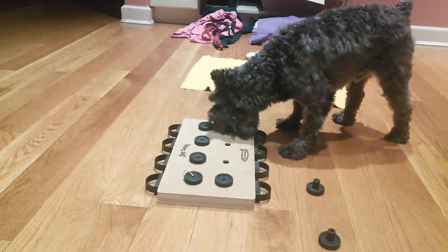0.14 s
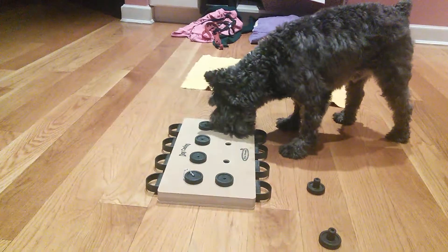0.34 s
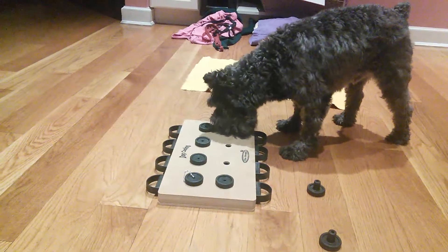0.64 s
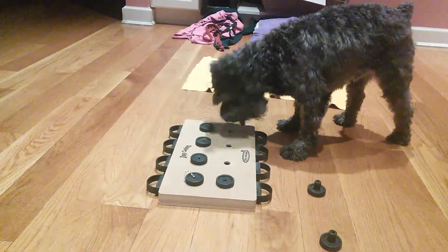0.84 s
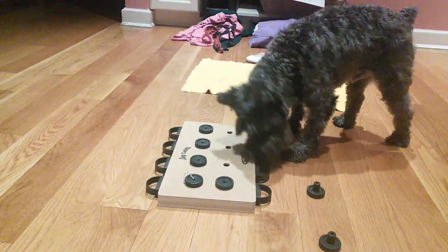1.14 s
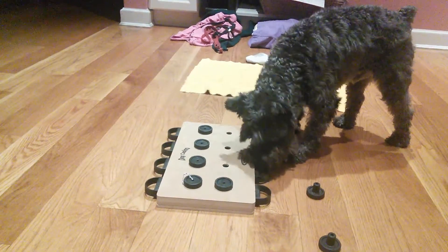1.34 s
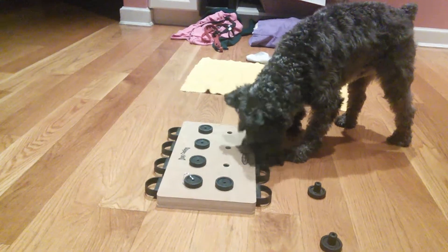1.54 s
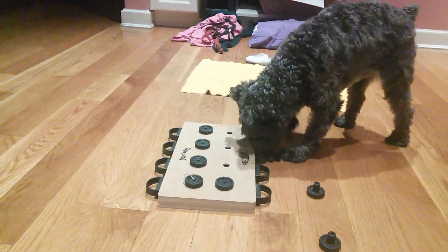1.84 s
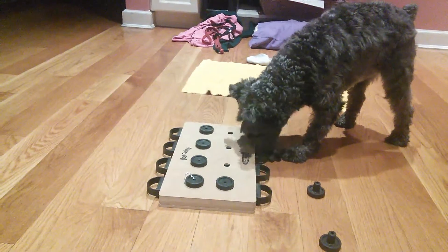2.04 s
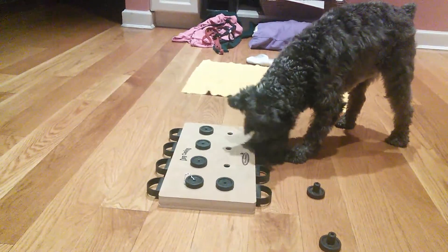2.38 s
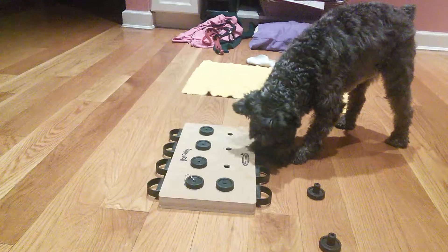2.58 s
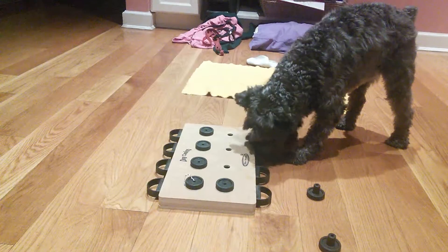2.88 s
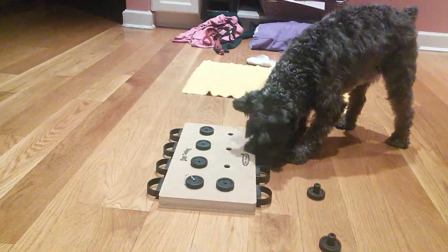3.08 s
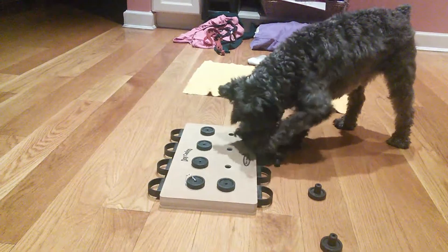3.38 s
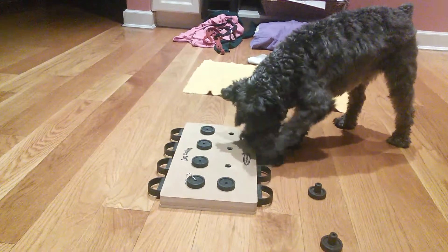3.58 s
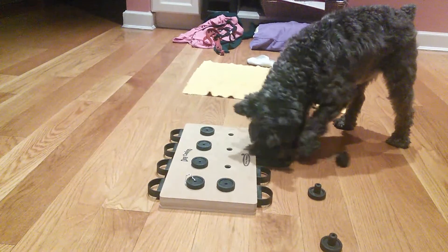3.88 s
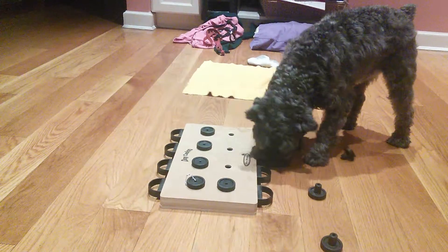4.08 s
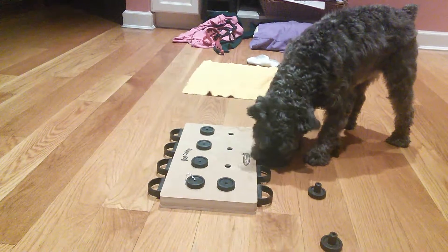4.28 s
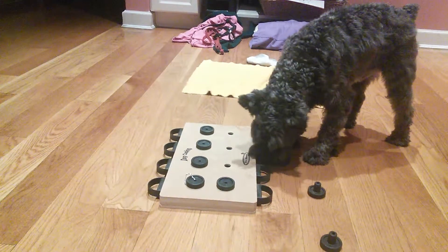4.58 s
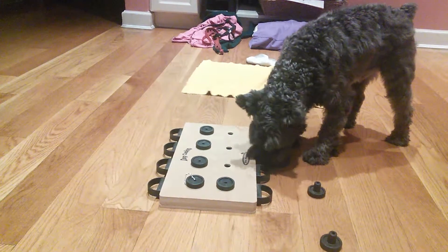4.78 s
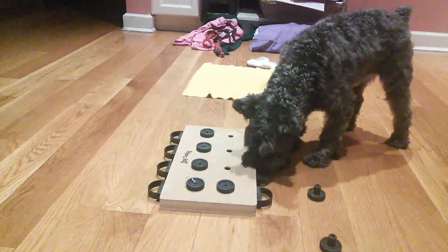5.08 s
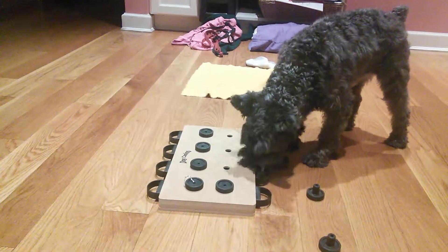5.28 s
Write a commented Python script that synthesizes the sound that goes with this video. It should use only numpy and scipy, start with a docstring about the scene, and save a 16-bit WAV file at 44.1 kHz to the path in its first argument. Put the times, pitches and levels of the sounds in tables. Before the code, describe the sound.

A dog works a hollow wooden treat puzzle on a hard floor, about a metre from the microphone. It opens with soft wood scraping and a few light knocks around 0.3 to 0.6 seconds, then a faint sniff. At 1.5 seconds the board drops with a loud clatter, bouncing faster and quieter until it rests at about 1.85. A short sniff at 2.3 leads to a cluster of sharp knocks near 2.45 and a smaller one at 2.7. Around 3.6 come more sniffs and taps, building to two loud hollow knocks at 3.75 and 3.85, the first with a bright click. From 4 seconds on there are light taps, uneven wooden sliding, faint paw shuffles and a very faint rustle of fur, with a small flurry of taps near 5.1. The room rings briefly after each blow, over faint steady background noise.

```python
"""A hollow wooden puzzle clatters on a hard floor as a dog noses and paws it, a metre from a phone.
The board drops and bounces to rest, and drawers and pegs knock: each blow rings the wood's short modes.
Wood slides in stick-slip grains, sniffs whistle in the holes, paws shuffle and fur or cloth rustles.
The bare room rings briefly after each blow, over a faint steady noise."""
import sys
import numpy as np
from scipy import signal
from scipy.fft import rfft, irfft, next_fast_len
from scipy.io import wavfile
from scipy.ndimage import uniform_filter1d

SR = 44100
rng = np.random.default_rng(int(sys.argv[2]) if len(sys.argv) > 2 else 0)


def to_wav(sig):
    """Store sig (one row per channel, or 1-D mono) as 16-bit WAV at the path in sys.argv[1].

    Samples outside -1..1 are clipped; the rate is SR.
    """
    pcm = np.clip(np.atleast_2d(sig), -1, 1) * 32767
    pcm = np.round(pcm).astype(np.int16)
    wavfile.write(sys.argv[1], SR, pcm.T)  # frames by channels


N = 239127

# the board rocking to rest: t/s, strength/dB
BOUNCES = [(1.522, -1), (1.6048, -3), (1.6518, -9.5), (1.6713, -6), (1.7146, -12), (1.7227, -18.5),
           (1.7534, -13), (1.7709, -29), (1.7846, -18.5), (1.7993, -29.5), (1.8065, -22), (1.8217, -30.5),
           (1.8324, -33.5), (1.8427, -29)]
# softer bounces are duller; rows are box, lid, small parts, tick: full-blow level/dB, slope/(dB/dB)
BOUNCE_MIX = [(-8, 0.67), (-0.5, 1), (-7.5, 0.92), (-13.5, 2)]
# hard knocks of drawers and pegs: t/s, box/dB, lid/dB, small parts/dB, tick/dB, contact/ms
KNOCKS = [(0.2992, -23.5, -26, -12.5, -35, 2.2), (0.4018, -20.5, -21.5, -31, -62, 2),
          (2.4305, -36.5, -30, -28, -33, 2.8), (2.4392, -14.5, -17, -14, -9.5, 4.3),
          (2.4462, -36, -23.5, -22.5, -19, 21), (2.465, -28.5, -16, -13.5, -15, 12),
          (2.7017, -25.5, -27.5, -36, -64, 0.43), (3.56, -36, -39.5, -24.5, -25, 4),
          (3.738, -11.5, -22.5, -4, -11.5, 2.7), (3.8272, -7, -6, -7, -22, 5.9),
          (5.1122, -44, -31.5, -36.5, -24, 0.82)]
# light touches: t/s, level/dB, kind of touch
TAPS = [(0.3128, -26.5, "box"), (0.4148, -23.5, "box"), (0.5183, -36, "box"), (0.5809, -30.5, "box"),
        (0.6285, -43, "lid"), (0.6446, -47, "lid"), (0.817, -48, "box"), (1.9301, -50.5, "claw"),
        (2.5058, -21.5, "lid"), (2.7105, -28.5, "edge"), (2.7163, -33, "edge"), (2.7205, -38, "edge"),
        (3.0217, -45, "lid"), (3.0311, -42, "lid"), (3.3607, -44.5, "peg"), (3.6175, -31, "peg"),
        (3.6614, -33, "lid"), (3.6917, -33, "rub"), (3.713, -27.5, "box"), (3.7265, -27, "peg"),
        (3.7534, -18.5, "peg"), (4.0834, -33.5, "box"), (4.0948, -54, "claw"), (4.1411, -37, "peg"),
        (4.1596, -49, "claw"), (4.1862, -31, "box"), (4.2473, -42, "box"), (4.2806, -37, "box"),
        (4.3203, -35, "box"), (4.3722, -43.5, "box"), (4.6048, -49, "lid"), (5.0462, -39, "box"),
        (5.0534, -28.5, "box"), (5.0612, -36, "box"), (5.0717, -35, "lid"), (5.0767, -36, "edge"),
        (5.0895, -36, "peg"), (5.1072, -40, "peg"), (5.1172, -31, "claw")]
# colour of each kind of touch: box/dB, lid/dB, small parts/dB, tick/dB, contact/ms
TOUCH_MIX = {"box": (-1.5, -21, -27.5, -32, 4), "lid": (-12.5, -1.5, -11, -21, 1.2),
             "peg": (-20, -10.5, -2, -13.5, 6.2), "rub": (-3, 3, -9.5, -26.5, 15),
             "edge": (-0.5, -4.5, -17, -33, 1.2), "claw": (-12.5, -7, -11, 2.5, 1.1)}
# tiny bright pings, as of a peg or claw: t/s, level/dB, f/Hz
PINGS = [(0.1204, -48, 4630), (0.2994, -22, 4100), (1.522, -38, 5830), (1.6048, -39, 5890),
         (1.6522, -33.5, 6990), (1.6707, -37, 7000), (1.723, -45, 7100), (2.038, -46.5, 5250),
         (3.0217, -42, 1700), (3.3406, -62, 5000), (3.7375, -11.5, 5100), (4.1602, -48, 10800)]
# where the registers of hollow box, lid, small parts and dry tick begin: f/Hz
PART_EDGES_HZ = [0, 1100, 2500, 5500]
# modes of the puzzle board: f/Hz, width/Hz, level/dB
BOARD_MODES = [(730, 174, -2.5), (830, 240, -1.5), (1250, 670, -16), (1496, 266, -4.5), (1775, 395, 8.5),
               (1965, 160, -22), (2700, 260, 3), (3005, 350, 4), (3530, 280, -5), (4400, 250, -14)]
# modes of the floor under it: f/Hz, width/Hz, level/dB
FLOOR_MODES = [(324, 110, -7), (455, 130, -21)]
# modes of the drawers: f/Hz, width/Hz, level/dB
DRAWER_MODES = [(574, 840, -7), (715, 272, 11), (850, 240, 9.5), (1395, 290, 1.5), (1626, 280, -1),
                (2122, 140, -3.5), (2340, 290, -4), (2907, 200, 3.5), (3270, 430, 14.5), (3700, 500, 6.5),
                (4100, 110, -15.5), (5070, 420, 7), (5280, 1100, -4.5)]
# strokes of wood on wood: t/s, length/s, start level/dB, end level/dB, scuff offset/dB
SLIDES = [(0.0, 0.21, -54.5, -64.5, -13), (0.196, 0.1, -59, -57.5, -7), (0.613, 0.55, -57, -85, -10.5),
          (3.096, 0.1, -75, -65.5, -9), (3.3, .2, -78, -81, 2.5), (3.585, 0.16, -68.5, -51.5, 3),
          (4.069, .14, -46, -57.5, -17), (4.266, .27, -58.5, -55, -42), (4.594, 0.52, -57.5, -60, -12.5),
          (5.157, .06, -54.5, -69, -5), (5.234, 0.23, -58.5, -63.5, -11.5)]
# puffs through the nose: peak t/s, level/dB, rise/s, fall/s
SNIFFS = [(0.84, -48.5, 0.046, 0.048), (2.282, -41.5, .006, 0.078), (2.404, -54, .004, 0.13),
          (2.428, -48, 0.009, .004), (3.575, -42.5, 0.0057, 0.1), (3.615, -38.5, 0.0093, 0.049),
          (3.68, -49, 0.046, .08)]
# resonances of nostrils and peg holes: f/Hz, width/Hz, level/dB
NOSE_MODES = [(1400, 300, -8), (1690, 300, -5), (2180, 300, -6), (2730, 330, 0), (3600, 1100, -13),
              (4960, 400, -2), (5700, 800, -12), (9000, 2500, -31)]
# paws shifting on the floor: peak t/s, level/dB, rise/s, fall/s
PAW_STEPS = [(0.03, -71, 0.075, 0.083), (0.23, -63, .03, 0.1), (4.1, -70.5, .03, 0.31),
             (4.536, -68, .5, 0.28), (4.684, -59.5, 0.052, 0.16), (4.83, -56.5, 0.041, 0.46),
             (5.242, -61.5, 0.027, .9)]
# brushes of fur or cloth: peak t/s, level/dB, rise/s, fall/s
RUSTLES = [(2.054, -66, .012, .09), (3.272, -74, .04, 0.13), (3.354, -73.5, 0.069, .24),
           (3.61, -61, .06, .07), (3.95, -70.5, .15, 0.79), (4.158, -70, .01, 0.21),
           (5.14, -79, .01, 0.071), (5.27, -76.5, 0.067, .4)]
# octave bands of the reverb tail: f/Hz, t60/s, trim/dB
ROOM_BANDS = [(280, 0.77, 0.5), (463.4, 0.55, 0), (1024, 0.5, 2.5), (2020, 0.52, -1), (4010, 0.48, 1),
              (7400, 0.45, -2), (13500, 0.34, 0.5)]
# spectrum of the room tone: f/Hz, relative density/dB
ROOM_TONE = [(15, -57.5), (25, -35), (53, -19), (166, -1.5), (249, -3.5), (416, -6), (489, -6), (607, -13),
             (1190, -9), (1440, -19), (1840, -14.5), (2000, -17.5), (16000, -34)]

FAR_END_UNTIL_S, FAR_END_PITCH = 1.0, 0.84  # the dog starts at the far end, whose hollow rings lower


def board_drop():
    """The board bounces to rest and sounds the floor under it; returns the direct and wall feeds."""
    drops = [(s, *(full + slope * db for full, slope in BOUNCE_MIX), 0.21) for s, db in BOUNCES]
    board = blows(drops, BOARD_MODES, scatter_db=1, rise_ms=0.58, tick_top_hz=7600, blur=1)
    direct, walls = small_box(board, low_hz=601) + ring(board, FLOOR_MODES, order=2)
    return np.array([direct, band(walls, 100, 4770, order=3)])  # aimed treble: little reaches the walls


def drawer_knocks():
    """Knocks and light taps ring the hollow drawers; returns the direct and wall feeds."""
    taps = [(s, *(db + np.array(TOUCH_MIX[kind][:-1])), TOUCH_MIX[kind][-1]) for s, db, kind in TAPS]
    out = 0
    for far_end, pitch in (True, FAR_END_PITCH), (False, 1):
        rows = [row for row in KNOCKS + taps if (row[0] < FAR_END_UNTIL_S) == far_end]
        modes = [(hz * pitch if hz < PART_EDGES_HZ[1] else hz, width, db) for hz, width, db in DRAWER_MODES]
        wood = blows(rows, modes, scatter_db=2, rise_ms=0.27, tick_top_hz=13680, blur=0.4)
        out = out + small_box(wood, low_hz=673 * pitch)
    return out


def blows(rows, modes, scatter_db, rise_ms, tick_top_hz, blur):
    """Struck wood rings, rattles and ticks, from rows laid out like KNOCKS; returns direct and wall feeds."""
    t = np.arange(2048) / SR
    direct, walls = np.zeros((2, N + len(t)))
    hz, width, db = np.transpose(modes)[:, :, None]
    part = np.minimum(np.searchsorted(PART_EDGES_HZ, hz[:, 0]) - 1, 2)
    impulse = 1. * (t == 0)
    tick = band(impulse, PART_EDGES_HZ[3], tick_top_hz)

    def layers(partials):
        """Group the modes into box, lid and small parts, with the tick on top."""
        return [partials[part == k].sum(axis=0) for k in range(3)] + [tick]

    ringing = undb(db) * mode_envelope(t, rise_ms, width) * np.sin(2 * np.pi * hz * t)
    clean_layers = layers(ringing)
    wall_layers = layers(ringing * np.exp(-np.pi * blur * width * t))  # all sides blend: an evener colour
    for s, *levels_db, contact_ms in rows:
        spot = undb(scatter_db * rng.standard_normal(hz.shape))  # each new spot reweights the modes
        grit = 0.15 * np.exp(-1000 * t / max(contact_ms, .1))
        force = impulse + grit * rng.standard_normal(len(t))  # one impact, then loose micro-contacts
        span = slice(int(s * SR), int(s * SR) + len(t))
        for level_db, struck, clean, blurred in zip(levels_db, layers(spot * ringing),
                                                    clean_layers, wall_layers):
            voice = signal.fftconvolve(struck, force)[:len(t)]
            gain = undb(level_db) * np.linalg.norm(clean) / np.abs(clean).max()
            gain *= np.sqrt(1 + np.sum(grit ** 2))  # the rattle adds energy
            direct[span] += gain * voice / np.linalg.norm(voice)
            walls[span] += gain * blurred / np.linalg.norm(blurred)
    return np.array([direct[:N], walls[:N]])


def mode_envelope(t, rise_ms, width_hz):
    """A struck mode swells for a moment; the wider it is, the faster it dies."""
    return (1 - np.exp(-1000 * t / rise_ms)) ** 2 * np.exp(-np.pi * width_hz * t)


def small_box(x, low_hz):
    """A small box radiates little bass."""
    return signal.sosfilt(signal.butter(6, low_hz, "highpass", fs=SR, output="sos"), x)


def pings():
    """Each ping is one short, bright mode."""
    out, t = np.zeros(N), np.arange(1024) / SR
    envelope = mode_envelope(t, rise_ms=.4, width_hz=420)
    for s, db, hz in PINGS:
        out[int(s * SR):][:len(t)] += undb(db) * envelope / envelope.max() * np.sin(2 * np.pi * hz * t)
    return out


def sliding_wood():
    """Uneven stick-slip grains shake the lower drawer modes; a finer scuff rides on top."""
    grains = rng.standard_normal(N) * flicker(120, 5.0) * flicker(25, 0.88)
    hollow = unit(ring(grains, [mode for mode in DRAWER_MODES if mode[0] < 1500]))
    body = unit(hollow + 0.89 * unit(band(grains, 280, 880)))
    scuff = unit(band(grains, 2500, 4200) + .4 * band(grains, 4700, 5100))
    body_level = strokes([row[:-1] for row in SLIDES])
    scuff_level = strokes([(s, length, a + offset, b + offset) for s, length, a, b, offset in SLIDES])
    return body_level * body + scuff_level * scuff


def sniffs():
    """Fluttering air whistles in nostrils and peg holes."""
    air = rng.standard_normal(N) * flicker(90, 4.0)
    return swells(SNIFFS) * unit(ring(air, NOSE_MODES, order=2))


def paws():
    """A soft low shuffle carried by the floorboards."""
    return swells(PAW_STEPS) * unit(band(rng.standard_normal(N) * flicker(9.4, 4.7), 140, 330))


def rustle():
    """Fur or cloth brushes with a thin, high hiss."""
    return swells(RUSTLES) * unit(band(rng.standard_normal(N) * flicker(40, 1.5), 10000, 17000))


def room_reverb(x, wet_db=-5, gap_s=.004, rise_s=.0029):
    """Diffuse echoes build after a short gap, bunch at the first walls and die faster in the treble."""
    t = np.arange(int(.9 * SR)) / SR
    tail = 0
    for hz, t60, db in ROOM_BANDS:
        octave = unit(band(rng.standard_normal(len(t)), hz / np.sqrt(2), hz * np.sqrt(2)))
        tail = tail + undb(db - 60 * t / t60) * octave * np.sqrt(hz)
    tail *= 1 - np.exp(-np.maximum(t - gap_s, 0) / rise_s)
    tail *= undb(2.5 * np.exp(-((t - .017) / .0031) ** 2))  # the first walls answer at 17 ms
    return undb(wet_db) * signal.fftconvolve(x, tail / np.linalg.norm(tail))[:N]


def room_tone(level_db=-67):
    """A bed of steady house and microphone noise, wavering a little."""
    size = next_fast_len(N)
    hz, db = np.transpose(ROOM_TONE)
    bins_hz = np.arange(size // 2 + 1) * SR / size
    colour = undb(np.interp(np.log(bins_hz + 1), np.log(hz), db))
    noise = irfft(rfft(rng.standard_normal(size)) * colour, size)[:N]
    return undb(level_db) * unit(noise) * flicker(1.7, 0.4)


def strokes(rows):
    """Fader moves that run evenly in dB across each stroke, with soft edges."""
    t = np.arange(N) / SR
    level = sum(undb(np.interp(t, [s, s + length], [from_db, to_db])) * (t >= s) * (t <= s + length)
                for s, length, from_db, to_db in rows)
    return uniform_filter1d(level, size=400, mode="nearest")


def swells(rows):
    """Each swell climbs 20 dB in its rise time and sinks 20 dB in its fall time."""
    t = np.arange(N) / SR
    return sum(undb(db - 20 * np.maximum((s - t) / rise, (t - s) / fall)) for s, db, rise, fall in rows)


def flicker(rate_hz, spread_db):
    """A gain that glides between random levels."""
    hold = int(SR / rate_hz)
    steps = np.repeat(rng.standard_normal(N // hold + 1), hold)
    return undb(spread_db * uniform_filter1d(steps, hold)[:N])


def ring(x, modes, order=1):
    """Drive a bank of resonances, each applied order times; neighbours swing in opposite sense."""
    out = 0
    for k, (hz, width, db) in enumerate(modes):
        y = x
        for _ in range(order):
            y = signal.lfilter(*signal.iirpeak(hz, hz / width, fs=SR), y)
        out = out + (-1) ** k * undb(db) * y
    return out


def band(x, lo_hz, hi_hz, order=2):
    return signal.sosfilt(signal.butter(order, [lo_hz, hi_hz], "bandpass", fs=SR, output="sos"), x)


def undb(db):
    return 10 ** (np.asarray(db) / 20)


def unit(x):
    return x / np.sqrt(np.mean(x ** 2))


def scene():
    """Puzzle and sniffs feed the reverb; paws, rustle and room tone stay dry."""
    direct, walls = board_drop() + drawer_knocks()
    ping, slide, nose = pings(), sliding_wood(), sniffs()
    close = direct + ping + slide + nose
    send = walls + undb(-1) * ping + slide + undb(-5.5) * nose
    return (close + room_reverb(send) + paws() + rustle() + room_tone())[None]


def record(dry):
    """The phone rounds the loudest peaks and cuts the top."""
    ceiling, top_hz = undb(-2.6), 16000
    rounded = dry / (1 + (np.abs(dry) / ceiling) ** 8) ** (1 / 8)
    return signal.sosfilt(signal.ellip(10, .2, 90, top_hz, fs=SR, output="sos"), rounded)


dry = scene()
out = record(dry)
to_wav(out)
```